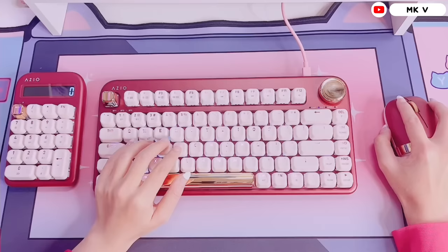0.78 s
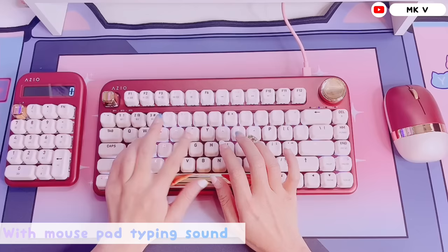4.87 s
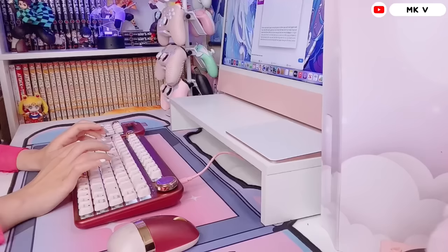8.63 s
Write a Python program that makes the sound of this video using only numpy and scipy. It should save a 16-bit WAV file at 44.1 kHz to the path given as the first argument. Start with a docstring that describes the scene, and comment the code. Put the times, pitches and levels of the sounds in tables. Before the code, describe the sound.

At a desk in a small room, a mouse clicks twice in two pairs, the first sharp and bright, the second softer. Skin brushes lightly and fingertips settle on keycaps. From about two and a half seconds, fast clicky typing runs on, with snappy ticks, plastic clacks, light desk thumps and two heavier space bar returns. A low hum sits underneath. The microphone is close, the room short and dry.

```python
"""At a desk in a small room: two pairs of mouse clicks, fingers settling on keycaps, then fast clicky typing.
One microphone, near enough that the contacts outweigh the room: each is a burst of tiny impacts ringing plastic
modes, with slow desk modes under the keys and filtered noise for the room's short answer.
A machine hums low as steady sines over coloured noise. Four shots are cut together; the second is lower in
pitch, and after each cut the background fades in."""
import sys
import numpy as np
from scipy import signal
from scipy.fft import rfft, irfft
from scipy.io import wavfile
from scipy.ndimage import uniform_filter1d

SR = 44100
rng = np.random.default_rng(int(sys.argv[2]) if len(sys.argv) > 2 else 0)


def bounce(signal):
    """Save signal as a 16-bit WAV file at the path given by the first command-line argument."""
    frames = np.transpose(np.atleast_2d(signal))
    limited = np.clip(frames, -1, 1)
    pcm = np.round(limited * 32767).astype(np.int16)
    wavfile.write(sys.argv[1], SR, pcm)


def to_linear_factor(level_db):
    """Convert decibel levels (scalar or array-like) to linear amplitude factors."""
    exponent = np.asarray(level_db, float) / 20
    return 10 ** exponent


N = 409246


def rms_one(x):
    """Scale to rms 1."""
    return x / np.sqrt(np.mean(x ** 2) + 1e-20)


def band(x, low_hz, high_hz):
    """Butterworth band-pass."""
    sos = signal.butter(2, [low_hz, min(high_hz, 0.45 * SR)], "band", fs=SR, output="sos")
    return signal.sosfilt(sos, x)


def ring(clicks, hz, t60):
    """A two-pole resonator: a unit click sets a decaying sine of initial height 1 ringing."""
    radius = to_linear_factor(-60 / (t60 * SR))
    angle = 2 * np.pi * hz / SR
    # the tiny offset keeps the filter clear of denormal numbers
    return signal.lfilter([0, np.sin(angle)], [1, -2 * radius * np.cos(angle), radius ** 2], clicks + 1e-18)


# Noise floor of the place. Each row: frequency in Hz, relative level in dB per Hz.
ROOM_NOISE = [(30, 1), (75, 2), (140, -7), (300, -16), (900, -21.5), (3000, -27.5), (8000, -35.5),
              (15000, -38)]


def room_noise():
    """Steady noise coloured by its spectrum, rms 1."""
    hz = np.maximum(np.fft.rfftfreq(N, 1 / SR), 20)
    points_hz, points_db = np.transpose(ROOM_NOISE)
    colour_db = np.interp(np.log(hz), np.log(points_hz), points_db)
    return rms_one(irfft(rfft(rng.standard_normal(N)) * to_linear_factor(colour_db), N))


HUM_HZ = 57.95   # before the shot's pitch factor
# Weaker steady tones of the machine. Each row: frequency in Hz before the pitch factor, dB relative to the hum.
HUM_TONES = [(133, -30.5), (190, -49), (220, -29), (283, -35.5), (362, -39.5)]


def hum(t, speed):
    """One strong low sine of rms 1 and a few faint ones above it, all following the shot's pitch."""
    tones = [(HUM_HZ, 0)] + HUM_TONES
    return np.sqrt(2) * sum(to_linear_factor(db) * np.sin(2 * np.pi * hz * speed * t) for hz, db in tones)


# Where each shot begins, in seconds; the first is already under way at 0.
CUTS = [-1.0, .808, 2.457, 8.658]
# The shots. Each row: playing speed as a pitch factor, hum level at start and at end in dB,
# room noise level in dB, fade-in of the background in seconds.
SHOTS = [(0.98, -30, -27, -45, .15), (.927, -39.5, -35, -53.5, 0.16), (0.98, -28.5, -29, -42.5, 0.084),
         (0.98, -24.5, -25, -42, 0.15)]


def speed_at(s):
    """Pitch factor of the shot that holds each moment."""
    return np.array(SHOTS)[np.searchsorted(CUTS, s) - 1, 0]


def knocks(times, peak_db, modes, rattle_s, rise_s, cut_hz, top_hz, detune, size=2048):
    """Each contact is a flurry of tiny impacts, then looser chatter, exciting modes of varied pitch and strength."""
    # soft touches are drawn out
    t = np.arange(1, size + 1) / SR / to_linear_factor(-0.2 * np.minimum(peak_db, 0))[:, None]
    chatter = 0.11 * np.exp(-t / (6.1 * rattle_s))
    shape = (1 - np.exp(-t / rise_s)) * (np.exp(-t / rattle_s) + chatter)
    impacts = rng.standard_normal((len(times), size))
    flurry = impacts * np.abs(impacts) * shape
    strength = to_linear_factor(3 * rng.standard_normal((len(times), len(modes))))
    pitch = speed_at(times) * (1 + detune * rng.uniform(-0.9, 1, len(times)))
    rows = np.zeros((len(times), size))
    for k, (hz, db, t60) in enumerate(modes):
        rows += (-1) ** k * to_linear_factor(db) * strength[:, [k]] * ring(flurry, hz, t60)
    # each part radiates in a range of its own; two passes steepen the edges
    rows = band(band(rows, cut_hz, top_hz), cut_hz, top_hz)
    out = np.zeros(N + size)
    for s, gain, row, factor in zip(times, to_linear_factor(peak_db), rows, pitch):
        row = signal.resample(row, round(size / factor))[:size]
        peak = np.sqrt(2 * uniform_filter1d(row ** 2, size=80).max())
        first = round(s * SR)
        out[first:first + len(row)] += gain / peak * row
    return out[:N]


# Mouse contacts. Each row: start in seconds, peak levels of shell, switch tick and base in dB.
MOUSE = [(0.26, -34, -45, -40), (0.2741, -35.5, -42, -39), (0.6176, -31, -7.5, -33.5),
         (.645, -36, -42, -38), (0.709, -21, -45, -35), (0.7288, -23.5, -9, -29), (.768, -37, -44.5, -40),
         (.815, -55, -66, -62), (1.118, -35.5, -24, -42), (1.289, -35, -23.5, -47)]
# Modes of switch leaf, shell and base. Each row: nominal frequency in Hz, relative level in dB,
# nominal 60 dB decay in seconds.
SNAP_MODES = [(7400, -7, .003), (8500, -19, .05), (8700, 0, .005), (10000, -3, .003), (13500, -4, .002),
              (15600, -1, .003)]
SHELL_MODES = [(1600, -10.5, 0.024), (2370, -7.5, 0.018), (3280, 8.5, 0.0029), (4750, 7, 0.0028)]
BASE_MODES = [(260, -10.5, 0.013), (724, -6.5, 0.0062), (1480, -3.5, 0.003)]


def mouse():
    """A sharp switch snap with a ringing leaf inside a small shell."""
    s, shell_db, tick_db, base_db = np.transpose(MOUSE)
    snap = knocks(s, tick_db, SNAP_MODES, rattle_s=0.001, rise_s=0.0001,
                  cut_hz=5500, top_hz=17500, detune=0.01)
    shell = knocks(s, shell_db, SHELL_MODES, rattle_s=0.0013, rise_s=0.00034,
                   cut_hz=2100, top_hz=6500, detune=0.03)
    base = knocks(s, base_db, BASE_MODES, rattle_s=0.003, rise_s=0.00049,
                  cut_hz=94, top_hz=2500, detune=0.024)
    return snap + shell + base


# The answer of the place. Each row: band frequency in Hz, relative level in dB per Hz, 60 dB decay in seconds.
ROOM_TAIL = [(500, 6, 0.11), (1280, 2, 0.24), (2950, -0.5, 0.19), (5800, -3, 0.16), (8300, 9, 0.15),
             (13800, 10, 0.041)]


def room_tail(size=16384):
    """Impulse response of board, desk and walls: noise dying at its own pace in each band."""
    t = np.arange(size) / SR
    tail = np.zeros(size)
    for hz, db, t60 in ROOM_TAIL:
        noise = rms_one(band(rng.standard_normal(size), hz / 1.43, hz * 1.81))
        tail += to_linear_factor(db - 60 * t / t60) * noise * np.sqrt(hz)
    onset = 1 - np.exp(-t / 0.002)
    return tail * onset / np.sqrt(np.sum(tail ** 2))


def rustle(modes, per_s):
    """Dense random grains ringing a set of modes; rms 1."""
    grains = rng.standard_normal(N) * (rng.random(N) < per_s / SR)
    ringing = sum(to_linear_factor(db) * ring(grains, hz, t60) for hz, db, t60 in modes)
    return rms_one(band(ringing, 1100, 12000))


# Skin sliding over mat and keycaps. Each row: time in seconds, hiss level in dB, nominal rub level in dB.
HANDS = [(1.3, -98, -69), (1.45, -61.5, -57), (1.55, -50.5, -60), (1.7, -65, -62.5), (1.85, -72.5, -65),
         (2.009, -72, -63), (2.071, -63, -50), (2.15, -70, -64), (2.25, -70, -56.5), (2.45, -68, -74)]
# Modes of keycaps and keyboard case. Each row: nominal frequency in Hz, relative level in dB,
# nominal 60 dB decay in seconds.
CAP_MODES = [(1900, -7.5, 0.0066), (2774, 0.5, 0.01), (2970, 3, 0.0085), (3445, 2.5, 0.0055),
             (4098, -3, 0.008), (4530, -2.5, 0.0041)]
CASE_MODES = [(381, -24, 0.063), (838, -7, 0.0067), (1064, -4, 0.014), (1236, 1, 0.017), (1520, 2, 0.0045)]


def hands():
    """Smooth hiss of skin on cloth and a grainy rub that rings the keycaps and case."""
    t = np.arange(N) / SR
    s, hiss_db, rub_db = np.transpose(HANDS)
    hiss = rms_one(band(rng.standard_normal(N), 7000, 14000))
    rub = rustle(CAP_MODES, 1200) + to_linear_factor(-6) * rustle(CASE_MODES, 1200)
    hiss_gain = to_linear_factor(np.interp(t, s, hiss_db, -120, -120))
    rub_gain = to_linear_factor(np.interp(t, s, rub_db, -120, -120))
    return hiss * hiss_gain + rub * rub_gain


# Modes of the key switches. Each row: nominal frequency in Hz, relative level in dB,
# nominal 60 dB decay in seconds.
TICK_MODES = [(7793, -9.5, 0.0079), (8730, -3, 0.0022), (10180, -1, 0.0034), (11000, -4, 0.0022),
              (12990, -4.5, 0.0011), (14640, -0.5, 0.0024), (15000, -7.5, 0.0032)]


def key_travel(s, cap_db):
    """Stems scrape in their housings, swelling from just before each contact and dying as the key comes to rest."""
    t = np.arange(4096) / SR
    starts = np.zeros(N)
    starts[np.round((s - 0.004) * SR).astype(int)] = to_linear_factor(0.84 * cap_db - 24)
    swell = (1 - np.exp(-t / 0.001)) * np.exp(-t / 0.021)
    motion = signal.fftconvolve(starts, swell)[:N]
    grain = rustle(CAP_MODES, 4800)
    grain += to_linear_factor(-10) * rustle(TICK_MODES, 4000)
    grain += to_linear_factor(-8) * rustle(CASE_MODES, 4400)
    return motion * grain


# Fingertips tapping onto caps. Each row: start in seconds, cap level in dB.
TOUCHES = [(1.3742, -44), (1.425, -39), (1.726, -41.5), (1.778, -28), (1.895, -33), (2.0391, -33.5),
           (2.092, -35), (2.2419, -34), (2.4645, -26.5), (2.5462, -25), (2.653, -21.5), (2.754, -27),
           (2.876, -35), (3.0144, -24), (3.115, -29), (3.1372, -32.5), (3.1857, -20), (3.3293, -20),
           (3.4815, -19.5), (3.6, -17.5), (3.627, -20), (3.637, -17.5), (3.9323, -18), (4.4231, -15.5),
           (4.5493, -19.5), (4.5981, -19), (4.7328, -23), (4.9706, -20), (5.0481, -17), (5.157, -20.5),
           (5.165, -23), (5.2743, -23), (5.3166, -25), (5.4209, -25), (5.436, -24.5), (5.4458, -18.5),
           (5.562, -27.5), (5.5948, -21), (5.709, -26.5), (5.7223, -20.5), (5.8954, -23), (5.9545, -26),
           (6.082, -32), (6.0998, -20.5), (6.248, -18), (6.3504, -25), (6.361, -27), (6.367, -19),
           (6.4813, -25), (6.639, -24), (6.6927, -23.5), (6.7904, -19), (6.9772, -26), (7.2588, -22.5),
           (7.74, -33), (8.0336, -22.5), (8.0803, -29.5), (8.0919, -19.5), (8.2874, -28), (8.4074, -33.5),
           (8.517, -21), (8.7187, -34.5), (9.019, -25), (9.143, -26.5), (9.2299, -24)]
# Tick of a 0 dB tap in dB, tick dB per dB of tap; case in dB relative to the tap.
TICK_AT_TOUCH_DB, TICK_FOLLOWS, CASE_AT_TOUCH_DB = 1.5, 1.4, -8.5
# Faint chance brushes as the fingers settle: earliest and latest start in seconds, middle level in dB.
SETTLING = (1.9, 2.42, -44.5)
# Key presses: the switch clicks and the cap lands a moment later. Each row: click time in seconds,
# click level in dB, travel in seconds, landing level in dB, case level at landing in dB.
PRESSES = [(2.5887, 4, 0.0068, -19, -8), (2.769, -16.5, 0.0043, -4, -25.5),
           (2.8933, -10, .0084, -5.5, -19.5), (3.0291, -6.5, 0.0061, -2, -16),
           (3.146, -13, .0169, -3.5, -19.5), (3.367, -5.5, 0.014, -4, -16), (3.5085, 3.5, .0084, 0.5, -9),
           (3.8314, -7.5, .0163, -15.5, -30.5), (4.005, -9.5, .014, -5.5, -20),
           (4.1402, -3.5, .0109, -6.5, -19.5), (4.3058, -6, 0.0043, -3, -16), (4.441, 1, 0.0064, 2, -9),
           (4.622, -6.5, .0105, -9.5, -25.5), (4.783, -10.5, 0.0039, -9.5, -23),
           (4.929, -6.5, .0162, -13.5, -21), (5.334, -8, .003, -50, -64), (5.6074, -1, .0064, -4, -18),
           (5.7656, -3.5, 0.0049, -2.5, -20), (5.9815, -8.5, 0.0087, -2.5, -15),
           (6.1335, -12.5, .0062, -2, -17.5), (6.2775, 2, .0039, 3, -12), (6.396, -7, .0102, -8.5, -21.5),
           (6.5014, -4.5, .0082, -3.5, -18.5), (7.0265, -9.5, 0.0044, -4, -20.5),
           (7.1652, -14, 0.015, -5.5, -17.5), (7.3436, -7, .0143, -13, -23.5),
           (7.461, -16.5, .0156, -5.5, -14), (7.5749, -8, 0.0086, -5.5, -20),
           (7.7506, -2.5, .016, -3.5, -14), (7.873, -15.5, .0174, -4, -19.5),
           (8.002, 2.5, .0064, -5, -15.5), (8.1532, -4.5, 0.0074, -2.5, -18.5),
           (8.738, -19, .003, -34, -42), (8.877, -13, .0071, -16, -20.5), (9.204, -22, 0.0079, -16, -22)]
CAP_AT_CLICK_DB, CASE_AT_CLICK_DB = -8.5, -26   # relative to the click
TICK_AT_LANDING_DB = -11   # relative to the landing
# Single knocks of a key against its stop. Each row: start in seconds, cap level in dB, tick level in dB.
STOPS = [(2.6707, -7, -8.5), (2.729, -15, -26), (2.86, -13.5, -25.5), (2.9976, -13.5, -27),
         (3.204, 2, -5.5), (3.3047, -12.5, -16), (3.792, -9.5, -14.5), (3.9669, -5, -11.5),
         (4.0992, -15.5, -12), (4.1567, -19, -14.5), (4.275, -13, -13.5), (4.4323, -7, -10.5),
         (4.7543, -5.5, -10.5), (4.8918, -10, -12), (5.0647, -2, -15), (5.0705, -4.5, 7),
         (5.1903, -7.5, -14), (5.744, -10.5, -10), (5.9162, -4, -12), (6.2623, -8, -16),
         (6.6632, -13, -18.5), (6.909, 6, -4), (6.9837, -18, -18), (7.0017, -7, -18),
         (7.0075, -16.5, -10.5), (7.2313, -13, -17.5), (7.54, -18, -27.5), (7.707, -19, -18),
         (7.9852, -11, -10), (8.1126, -13.5, -17.5), (8.3333, -5, -19.5), (8.4722, 6.5, -6),
         (8.547, -11.5, -25), (8.56, -1.5, -6), (8.8551, -19, -16), (9.0309, -18.5, -23),
         (9.039, -11.5, -21.5), (9.1612, -16.5, -22.5)]
CASE_AT_STOP_DB, CASE_FOLLOWS = -14.5, 0.81   # case level for a 0 dB knock, dB per dB of knock


def key_contacts():
    """Rows of (s, cap dB, tick dB, case dB): each press gives a click and a landing; stops and taps give one."""
    rows = []
    for s, click, travel, landing, case in PRESSES:
        rows.append((s, click + CAP_AT_CLICK_DB, click, click + CASE_AT_CLICK_DB))
        rows.append((s + travel, landing, landing + TICK_AT_LANDING_DB, case))
    for s, cap, tick in STOPS:
        rows.append((s, cap, tick, CASE_AT_STOP_DB + CASE_FOLLOWS * cap))
    first, last, middle_db = SETTLING
    chance = rng.random(size=(20, 2))
    brushes = [(first + (last - first) * when, middle_db + 12 * (how - 0.5)) for when, how in chance]
    for s, db in TOUCHES + brushes:
        rows.append((s, db, TICK_AT_TOUCH_DB + TICK_FOLLOWS * db, db + CASE_AT_TOUCH_DB))
    return rows


def thumps(times, db, modes):
    """Single blows of random sign into slow modes."""
    clicks = np.zeros(N)
    clicks[np.round(np.asarray(times) * SR).astype(int)] = to_linear_factor(db) * rng.choice([-1, 1], len(times))
    return sum(to_linear_factor(level_db) * ring(clicks, hz, t60) for hz, level_db, t60 in modes)


# Modes of a dry plastic edge. Each row: nominal frequency in Hz, relative level in dB,
# nominal 60 dB decay in seconds.
CRACK_MODES = [(1620, -6, 0.00086), (3150, -0.5, 0.0012), (5530, 4.5, 0.00021), (9460, 0.5, 0.00027),
               (13130, -0.5, 0.00023)]
CRACK_UNDER_DB = -7   # relative to the mean of cap and tick
# Modes of the desk. Each row: frequency in Hz, relative level in dB, 60 dB decay in seconds.
DESK_MODES = [(79.2, 9, 0.22), (140.1, 0.5, 0.19), (179, -2, 0.14), (279, -3, 0.048)]


def keyboard():
    """The switch ticks sharpest, the cap clacks, its edge cracks, the case swells slower and the desk thumps below."""
    s, cap_db, tick_db, case_db = np.transpose(key_contacts())
    crack_db = (cap_db + tick_db) / 2 + CRACK_UNDER_DB
    out = knocks(s, tick_db, TICK_MODES, rattle_s=0.00086, rise_s=0.0001,
                 cut_hz=6900, top_hz=16280, detune=0.07)
    out += knocks(s, cap_db, CAP_MODES, rattle_s=0.0017, rise_s=0.00011,
                  cut_hz=1820, top_hz=5070, detune=0.045)
    out += knocks(s, case_db, CASE_MODES, rattle_s=0.002, rise_s=0.0014,
                  cut_hz=338, top_hz=1940, detune=0.1036)
    out += knocks(s, crack_db, CRACK_MODES, rattle_s=0.00064, rise_s=0.00005,
                  cut_hz=740, top_hz=17300, detune=0.11)
    desk = band(thumps(s, 0.8 * case_db - 26, DESK_MODES), 54, 400)
    return out + desk + key_travel(s, cap_db)


# Keys dragged sideways in their housings. Each row: start in seconds, length in seconds, nominal level in dB.
SCRAPES = [(1.775, 0.034, -51), (2.03, .08, -55), (2.22, 0.048, -54), (3.122, 0.028, -53),
           (4.53, 0.074, -32.5), (5.141, 0.046, -35), (5.42, .04, -37.5), (5.56, .045, -45),
           (6.089, 0.054, -38), (6.34, 0.072, -37.5), (7.145, .03, -43), (7.242, 0.067, -39.5),
           (8.082, 0.047, -35.5), (8.482, 0.059, -35), (8.891, 0.019, -23.5), (9.035, .025, -30),
           (9.202, 0.028, -24.5)]


def scrapes():
    """Short half-sine swells of dense grain ringing plastic edges, caps and case."""
    t = np.arange(N) / SR
    swell = sum(to_linear_factor(db) * np.sin(np.pi * np.clip((t - s) / length, 0, 1)) for s, length, db in SCRAPES)
    grain = to_linear_factor(-3) * rustle(CRACK_MODES, 1800)
    grain += rustle(CAP_MODES, 1400)
    grain += to_linear_factor(-5.5) * rustle(CASE_MODES, 1400)
    return swell * grain


# Space bar pressed, its wire rings on. Each row: start in seconds, blow level in dB.
SPACE_WIRE = [(6.665, -47.5), (8.334, -47)]
# Space bar springing back. Each row: start in seconds, rattle level in dB, thud blow level in dB.
SPACE_UP = [(6.9, -8.5, -28.5), (8.464, -2.5, -26.5)]


def space_bar():
    """The wire sings after a press; the long bar rattles up to its stop and thuds the case."""
    wire = band(thumps(*np.transpose(SPACE_WIRE), [(546, 0.0076, 0.98)]), 450, 750)
    s, rattle_db, thud_db = np.transpose(SPACE_UP)
    rattle = knocks(s, rattle_db, CAP_MODES + TICK_MODES, rattle_s=0.0019, rise_s=0.0023,
                    cut_hz=370, top_hz=17000, detune=0.018)
    thud = band(thumps(s + 0.017, thud_db, [(150.7, 3, 0.25), (180, -1, 0.17)]), 80, 210)
    return wire + rattle + thud


# Level of the room's answer in each shot, in dB.
SHOT_ROOM_DB = [-9.5, -8.5, -10, -4.5]
NOISE_AT_CUT = 0.2   # share of the room noise already there when a shot starts


def scene():
    """Each shot has its own hits and tail, cut dead at its end, over a background that fades in."""
    t = np.arange(N) / SR
    hits = mouse() + hands() + keyboard() + scrapes() + space_bar()
    tail, noise = room_tail(), room_noise()
    out = np.zeros(N)
    ends = CUTS[1:] + [N / SR]
    for start, end, room_db, shot in zip(CUTS, ends, SHOT_ROOM_DB, SHOTS):
        speed, first_db, last_db, noise_db, fade_s = shot
        inside = (t >= start) & (t < end)
        since, direct = t[inside] - start, hits[inside]
        wet = to_linear_factor(room_db) * signal.fftconvolve(direct, tail)[:len(direct)]
        hum_gain = to_linear_factor(np.interp(t[inside], [start, end], [first_db, last_db]))
        fade = np.minimum(since / fade_s, 1)
        background = fade * hum_gain * hum(since, speed)
        background += np.maximum(fade, NOISE_AT_CUT) * to_linear_factor(noise_db) * noise[inside]
        out[inside] = direct + wet + background
    return out[None]


def band_limit(x):
    """A steep low-pass at the top of the band."""
    return signal.sosfilt(signal.butter(12, 16510, fs=SR, output="sos"), x)


def record(dry):
    """The microphone drops the deepest bass and the loudest clacks overload."""
    heard = signal.sosfilt(signal.butter(2, 30, "high", fs=SR, output="sos"), dry)
    mix = np.clip(heard, -1, 1)
    return band_limit(mix)


dry = scene()
out = record(dry)
bounce(out)
```